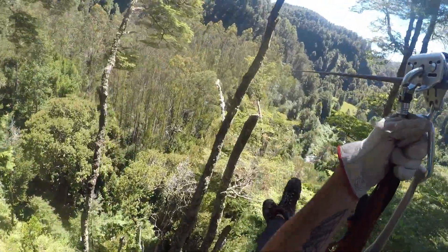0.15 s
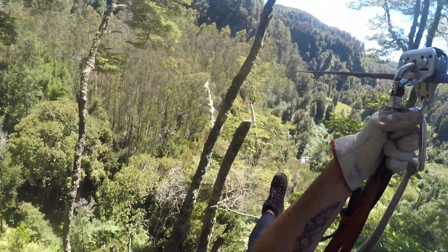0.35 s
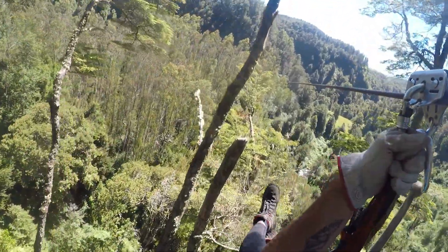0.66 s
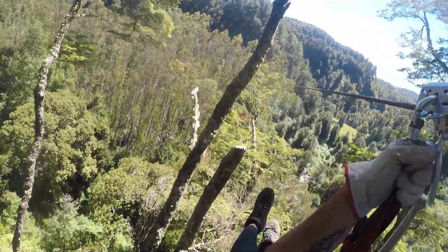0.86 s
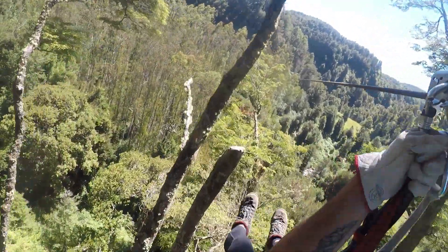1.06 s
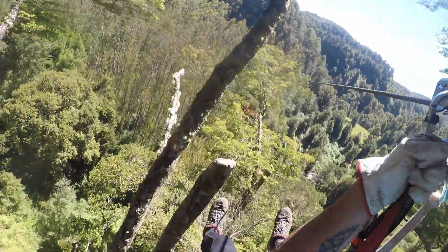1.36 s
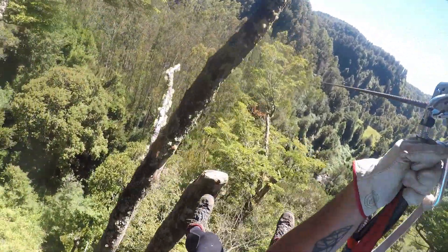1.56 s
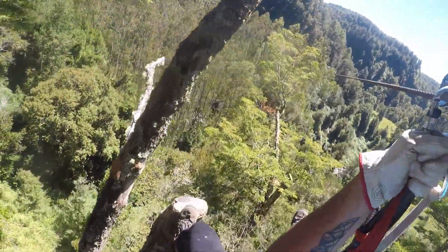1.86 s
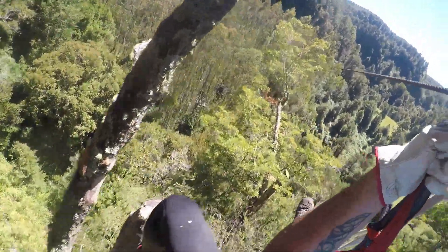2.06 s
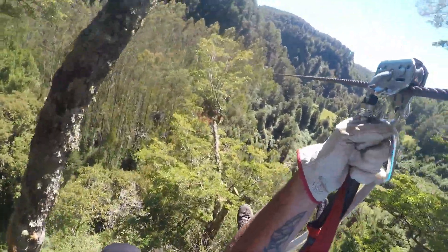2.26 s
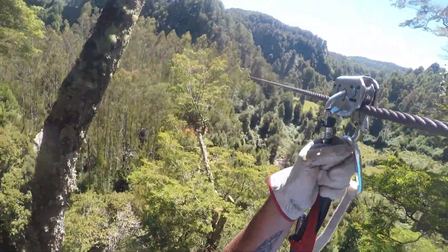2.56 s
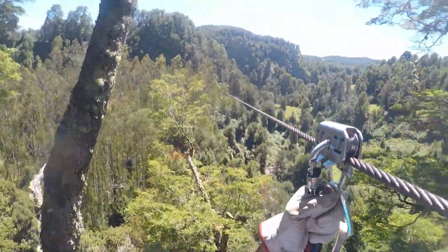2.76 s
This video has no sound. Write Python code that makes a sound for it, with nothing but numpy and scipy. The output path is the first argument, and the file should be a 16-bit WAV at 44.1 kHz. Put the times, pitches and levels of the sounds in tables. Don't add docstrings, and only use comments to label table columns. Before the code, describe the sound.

Zipline trolley whirring harshly on twisted cable slows to rattling ticks, halts, creeps on amid wind rumble

```python
import sys
import numpy as np
from scipy import signal
from scipy.fft import rfft, irfft, next_fast_len
from scipy.io import wavfile
from scipy.ndimage import uniform_filter1d, map_coordinates

SR = 44100
rng = np.random.default_rng(int(sys.argv[2]) if len(sys.argv) > 2 else 0)


def int16_out(signal):
    q = np.round(np.clip(np.atleast_2d(signal).T, -1, 1) * 32767)
    wavfile.write(sys.argv[1], SR, q.astype(np.int16))


def magnitude_from_level(level_db):
    exponent = np.asarray(level_db, float) / 20
    return 10 ** exponent


N = 127890

# time_s, crest_rate_per_s
CREST_RATE = [(0, 233), (.6, 230), (1, 212), (1.45, 183), (1.75, 160), (1.88, 146), (1.95, 92), (1.98, 79),
              (2.06, 82), (2.125, 86), (2.15, 70), (2.2, 55), (2.3, 50), (2.9, 60)]
# time_s, level_db
ROLL_LEVEL = [(0, -22.5), (.6, -22.5), (1, -21), (1.45, -21.5), (1.75, -21.5), (1.88, -21), (1.99, -29),
              (2.13, -26), (2.19, -35.5), (2.25, -54), (2.36, -57), (2.46, -51), (2.5, -41), (2.58, -42),
              (2.66, -34), (2.72, -40), (2.77, -43), (2.9, -41)]
# start_s, peak_db, dullness_db, t60_s
TICKS = [(1.9105, -14, -24, 0.024), (1.9732, -10.5, -33, 0.013), (2.0859, -11.5, -7, 0.018),
         (2.1198, -14.5, -11, 0.0072), (2.1324, -10.5, -22, 0.011), (2.16, -14.5, -7, 0.011),
         (2.2087, -22, 2, 0.027), (2.2463, -23.5, -23, 0.0075), (2.2906, -22.5, -25, 0.022),
         (2.3328, -35, -14, 0.011), (2.4794, -19.5, -23, 0.018), (2.508, -22, -22, 0.044),
         (2.5256, -21.5, 4, 0.047), (2.5592, -20, -5, 0.013), (2.594, -22, -2.5, 0.022),
         (2.6044, -22, 7, 0.012), (2.6274, -19, -9, 0.049), (2.6357, -20, 1, 0.024),
         (2.6707, -24, 5, 0.021), (2.7024, -17, -23, 0.0089), (2.7533, -15.5, 5.5, 0.013),
         (2.7614, -22, 3, 0.012), (2.774, -21, -3, 0.014), (2.7899, -16.5, -8, 0.012),
         (2.817, -24, 3, 0.015), (2.8506, -26, -5, 0.0097), (2.8644, -25.5, 8, 0.0068),
         (2.8869, -34.5, 19, 0.039),
         (1.873, -19, -20, .012), (1.888, -24, -20, .012), (1.928, -13, -20, .012),
                 (1.954, -14, -20, .012), (1.962, -14, -20, 0.018), (1.985, -18.5, -20, 0.014),
                 (1.996, -21, -20, .012), (2.0101, -18, -20, 0.008), (2.014, -21, -20, 0.012),
                 (2.0235, -18, -20, .012), (2.037, -18, -20, .012), (2.0479, -18, -11, 0.016),
                 (2.0614, -19, -16, 0.017), (2.075, -17, -18, .012), (2.097, -17, -18, 0.017),
                 (2.109, -25, -20, .012), (2.145, -21, -13, .014), (2.173, -17, -6, .014),
                 (2.1896, -21, -17, 0.011), (2.2137, -23, 0, 0.0099),
         (2.4658, -45, -10, .012), (2.488, -23, -15, .012), (2.5137, -28, -15, .012),
               (2.534, -26, -3, .012), (2.540, -22, 3, .012), (2.647, -25, -20, 0.017),
               (2.652, -29, -20, .015), (2.662, -29, -20, .015), (2.683, -28, -20, .015),
               (2.744, -26, 0, 0.017), (2.822, -30, -5, .008), (2.896, -35, 6, 0.014)]
# time_s, level_db
SIZZLE = [(0, -2), (.15, -3.5), (.28, -3), (.6, -3), (.8, -1), (1.3, 1.5), (1.75, 0), (1.95, 4.5),
          (2.1, 6.5), (2.2, -15), (2.45, -3), (2.6, -14), (2.9, 0)]
MODE_HZ = [680, 934, 1205, 1620, 1812, 2150, 3200, 3700, 4780, 6150, 7050, 7537, 8400, 11700]
# width_hz, left_db, right_db
MODE_AT_PORTS = [(250, -24.5, -35), (34.8, -21, -11.5), (86, -13, -5), (242, -20, -14.5),
                 (59.6, -16.5, -20.5), (295, -25.5, -30), (394, -41, -15.5), (464, -25, -11.5),
                 (90, -32, -11), (800, -19, -12), (1010, -11.5, -15.5), (45, -31, -20), (200, -36, -10.5),
                 (700, -41, -41)]
# frequency_hz, level_db
FRAME_TONE = [(300, -12), (800, 0.5), (7500, 1), (9000, -9), (10800, -22), (12000, -8), (13000, -20),
              (15000, -16)]
# frequency_hz, left_lead_rad
PORT_LEAD = [(0, -0.22), (1460, -3.5), (3270, -13.5), (3800, -13), (7900, -14.5), (10200, -14.5),
             (11000, -13), (15000, -11.5)]
# frequency_hz, level_db
SCATTERED = [(300, -33.5), (1000, -18), (2100, -14.5), (2900, -25), (5200, -18), (7000, -14), (9800, -22),
             (15000, -43.5)]
# frequency_hz, rms_db
MOUNT_HUM = [(40, -30), (55, -16), (82, -20), (110, -31), (150, -40), (185, -43), (230, -53)]
# time_s, pitch_hz, rms_db
PULLEY_TURN = [(0.0, 69.2, -39), (0.126, 73.5, -35), (0.206, 62.67, -33.5), (0.598, 64.13, -30.5),
               (0.692, 62.9, -25), (0.772, 55.2, -30), (0.92, 52.2, -30), (1.0, 54.6, -28),
               (1.354, 54.5, -24), (1.438, 53.23, -30.5), (1.676, 53.37, -28), (1.9, 58.32, -23)]
# time_s, strength_db
WIND_STRENGTH = [(0.0, -30.5), (.5, -29.5), (.72, -28.5), (1, -26), (1.3, -21.5), (1.55, -24),
                 (1.82, -20.5), (2.03, -15.5), (2.25, -18), (2.33, -21), (2.44, -24), (2.54, -20),
                 (2.68, -25), (2.9, -23)]
# frequency_hz, density_db_per_hz
RUMBLE_TONE = [(8, -43), (15, 1), (30, -7), (65, -8), (110, -17), (150, -34.5), (300, -34), (500, -67)]
# centre_s, peak_db, length_s, left_minus_right_db
PUFFS = [(0.134, -30.5, 0.031, -4.5), (0.227, -40, 0.014, 6), (0.622, -42, 0.011, 10),
         (0.707, -33, 0.014, -20), (0.929, -33, 0.012, -2), (1.055, -28, 0.03, -3.5),
         (1.238, -26.5, 0.031, -2), (1.289, -31.5, 0.023, -14), (1.502, -36, 0.017, -13),
         (1.697, -31, 0.025, 3), (1.843, -38.5, 0.037, 8), (1.99, -33, 0.021, 9), (2.136, -20, 0.0047, 8),
         (2.447, -29, 0.0053, 1), (2.537, -18.5, 0.01, 0)]
# frequency_hz, level_db
PUFF_TONE = [(40, -1.5), (110, -2.5), (200, -2), (400, -15.5), (900, -43.5)]
# start_s, level_db, pitch_hz
KNOCKS = [
    (2.041, -15.5, 800),
    (2.122, -17, 760),
    (2.533, -17.5, 700),
]
# pitch_ratio, level_db
KNOCK_MODES = [(.6, 1), (1.0, 4), (1.3, 3), (2.8, -8)]
# frequency_hz, density_db_per_hz
FOREST_TONE = [(76, -24), (130, -4), (277, -13), (690, -14), (1620, -18), (2720, -26.5), (9000, -36),
               (15000, -70)]

CREST_AT_S, LAST_CREST_S = 2.0852, 1.945
CREST_T60_S, CREST_JITTER, CREST_SCATTER_DB = 0.01, 0.071, 2.5
PAIRING_DB = 2.2
RUB_DB, RUB_DB_PER_OCTAVE = 0, 1.5
TICK_DB, SNAP_DB = -3.5, 9.5
TAIL_DB, TAIL_T60_S, RATTLE_DB = -19.5, 0.14, 5
DULL_HZ, SIZZLE_HZ = 7800, 9300
BEARING_HZ, BEARING_DB = 2090, -1.5
RING_HZ, RING_WANDER_HZ, RING_DB = 1208, 54.24, -20.5
STOP_S, HUM_FADE_S, HUM_WANDER_RAD = 2.27, .03, 1.1
TURN_OVERTONE_DB, TURN_FADE_S = -14.5, 0.068
SWAY_HZ, SWAY_WIDTH_HZ, SWAY_DB = 54.4, 20.7, -4
KNOCK_T60_S, KNOCK_LEAD_RAD = .016, 2.2
FOREST_DB = -48
TOP_HZ, CEILING = 15180, 1


def unit(x):
    return x / np.sqrt(np.mean(x ** 2) + 1e-20)


def along(points, hz):
    f, v = np.transpose(points)
    return np.interp(np.log(hz + 1), np.log(f + 1), v)


def curves(rows):
    s, *cols = np.transpose(rows)
    return [np.interp(np.arange(N) / SR, s, c) for c in cols]


def wobble(rate):
    knots = rng.standard_normal(int(3 * rate) + 4)
    return map_coordinates(knots, [np.arange(N) * rate / SR])


def filtered(x, response):
    m = 2 * next_fast_len(N // 2 + 4096)
    return irfft(rfft(x, m) * response(np.fft.rfftfreq(m, 1 / SR)), m)[..., :N]


def causal(gain):
    c = irfft(np.log(gain + 1e-6))
    c[1:len(c) // 2] *= 2
    c[len(c) // 2 + 1:] = 0
    return np.exp(rfft(c))


def wide_noise(alike):
    def mid_side_gain(hz):
        angle = np.arccos(np.clip(along(alike, hz), -1, 1)) / 2
        return np.array([np.cos(angle), np.sin(angle)])
    mid, side = filtered(rng.standard_normal((2, N)), mid_side_gain)
    return np.array([mid + side, mid - side])


def trolley():
    (rate,), (level_db,) = curves(CREST_RATE), curves(ROLL_LEVEL)
    passed = np.cumsum(rate) / SR
    passed -= passed[round(CREST_AT_S * SR)]
    level = magnitude_from_level(level_db + 0.55 * wobble(11.8))
    fast = np.clip((rate - 60) / 170, 0, 1)
    bursts, snaps = ticks()
    contact = crest_scrape(rate, passed, level) + bursts
    dulled = filtered(contact, lambda hz: 1 / (1 + 1j * hz / DULL_HZ) ** 2 * 1.116)
    drive = fast * contact + (1 - fast) * dulled + snaps
    sizzle = filtered(drive, lambda hz: 1 / (1 + (SIZZLE_HZ / (hz + 1)) ** 12))
    drive = drive + (magnitude_from_level(curves(SIZZLE)[0]) - 1) * sizzle
    low = lambda hz: 1 / (1 + (hz / BEARING_HZ) ** 6)
    drive = drive - .5 * filtered(drive, low) + filtered(bearings(rate, level), low)
    drive[0] += level * np.sqrt(fast) * flange_ring()
    scattered = filtered(drive[1:], lambda hz: causal(magnitude_from_level(along(SCATTERED, hz) + 14)))
    return filtered(drive[0], frame) + scattered + mount_hum(rate, passed)


def crest_scrape(rate, passed, level):
    at = np.flatnonzero(np.diff(np.floor(passed[:round(LAST_CREST_S * SR)])))
    jitter, scatter = np.clip(rng.standard_normal((2, len(at))), -1.7, 1.7)
    pairing_db = PAIRING_DB * (-1.) ** np.arange(len(at)) * (0.5 + wobble(8.3)[at])
    kick_at = np.clip(at + CREST_JITTER * jitter * SR / rate[at], 0, N - 1).astype(int)
    kicks = np.zeros(N)
    kicks[kick_at] = magnitude_from_level(CREST_SCATTER_DB * scatter + pairing_db)
    t = np.arange(SR // 20) / SR
    kick_shape = magnitude_from_level(-60 * t / CREST_T60_S) * (1 - np.exp(-t / 0.00024))
    crests = np.abs(signal.fftconvolve(kicks, kick_shape)[:N])
    crests /= np.sqrt(uniform_filter1d(crests ** 2, SR // 10) + 0.008)
    rub = magnitude_from_level(RUB_DB + RUB_DB_PER_OCTAVE * np.log2(rate / 230) + 0.96 * wobble(70))
    return np.hypot(crests, rub) * level * rng.standard_normal((3, N))


def ticks():
    bursts, snaps = np.zeros((2, 3, N))
    t = np.arange(SR // 20) / SR
    snap_t = t[:40]
    rattle_db = RATTLE_DB * np.clip(wobble(220), -2, 2)
    for s, db, dull_db, t60 in TICKS:
        start = round(s * SR)
        uneven_db = np.resize(rattle_db[start:], len(t))
        tail = magnitude_from_level(TAIL_DB - 60 * t / TAIL_T60_S + uneven_db)
        burst = rng.standard_normal((3, len(t))) * (magnitude_from_level(-60 * t / max(t60, .003)) + tail)
        burst = burst + magnitude_from_level(dull_db) * uniform_filter1d(burst, size=9, origin=4)
        snap = magnitude_from_level(db + TICK_DB + SNAP_DB - 60 * snap_t / 0.00061)
        snaps[:, start:][:, :40] += snap * rng.standard_normal((3, 40))
        spot = bursts[:, start:][:, :len(t)]
        spot += magnitude_from_level(db + TICK_DB) * burst[:, :spot.shape[1]]
    return bursts, snaps


def bearings(rate, level):
    gain_db = np.log2(rate / 230) + BEARING_DB + 1.82 * wobble(23.03)
    return level * magnitude_from_level(gain_db) * rng.standard_normal((3, N))


def flange_ring():
    phase = 2 * np.pi * np.cumsum(RING_HZ + RING_WANDER_HZ * wobble(30)) / SR
    return magnitude_from_level(RING_DB + 3.1 * wobble(24.98)) * np.sin(phase)


def frame(hz):
    power = 0
    for centre, (width, left_db, right_db) in zip(MODE_HZ, MODE_AT_PORTS):
        power = power + magnitude_from_level([[left_db], [right_db]]) ** 2 / (1 + (2 * (hz - centre) / width) ** 2)
    gain = np.sqrt(power) * magnitude_from_level(along(FRAME_TONE, hz))
    mean = np.sqrt(gain[0] * gain[1])
    lead = np.interp(hz, *np.transpose(PORT_LEAD)) / 2
    response = causal(mean) * gain / mean * np.exp(1j * np.array([lead, -lead]))
    return response / np.sqrt(np.mean(mean ** 2))


def mount_hum(rate, passed):
    level = magnitude_from_level(along(MOUNT_HUM, rate) + 2.8 * wobble(18) + 1.5)
    hum = level * np.sin(2 * np.pi * passed + HUM_WANDER_RAD * wobble(15))
    after_stop = (np.arange(N) / SR - STOP_S) / HUM_FADE_S
    return hum / (1 + np.exp(np.clip(after_stop, -20, 20)))


def pulleys():
    hz, level_db = curves(PULLEY_TURN)
    phase = 2 * np.pi * np.cumsum(hz) / SR
    fade = np.clip((PULLEY_TURN[-1][0] - np.arange(N) / SR) / TURN_FADE_S + 1, 0, 1)
    overtone = magnitude_from_level(TURN_OVERTONE_DB + 4.9 * wobble(9.02)) * np.sin(2 * phase + 1.42 * wobble(9.9))
    throb = np.sin(phase + 0.89 * wobble(16)) + overtone
    level = np.sqrt(2) * fade * magnitude_from_level(level_db - 2.0 + 3.5 * wobble(11))
    return level * throb * magnitude_from_level([[.4], [-.4]])


def wind():
    strength_db, = curves(WIND_STRENGTH)
    noise = wide_noise([(30, 0.97), (80, 0.84), (150, 0.65), (300, 0.069)])
    rumble = unit(filtered(noise, lambda hz: magnitude_from_level(along(RUMBLE_TONE, hz))))
    sway = unit(filtered(wide_noise([(30, 1.0)]),
                         lambda hz: 1 / (1 + (2 * (hz - SWAY_HZ) / SWAY_WIDTH_HZ) ** 2)))
    t = np.arange(N) / SR
    swell = np.zeros((2, N))
    for s, db, length, pan in PUFFS:
        swell += magnitude_from_level(db + np.array([[pan / 2], [-pan / 2]])) * np.exp(-((t - s) / length) ** 2)
    noise = wide_noise([(100, 0.17), (400, 0.033)])
    puff = unit(filtered(noise, lambda hz: magnitude_from_level(along(PUFF_TONE, hz))))
    gusts = magnitude_from_level(strength_db - 2.5 + 0.14 * wobble(7.5) + [[.5], [-.5]])
    return (rumble + magnitude_from_level(SWAY_DB) * sway) * gusts + magnitude_from_level(-2.0) * swell * puff


def harness():
    out, t = np.zeros((2, N)), np.arange(SR // 10) / SR
    for s, db, hz in KNOCKS:
        for ratio, mode_db in KNOCK_MODES:
            ring = np.sin(2 * np.pi * hz * ratio * t + np.array([[KNOCK_LEAD_RAD], [0]]))
            decay = magnitude_from_level(db + mode_db - 60 * t / KNOCK_T60_S) * (1 - np.exp(-t / 0.001))
            out[:, round(s * SR):][:, :len(t)] += decay * ring
    return out


def forest():
    noise = wide_noise([(200, 0.42), (2000, 0.037)])
    return magnitude_from_level(FOREST_DB + 3.0) * unit(filtered(noise, lambda hz: magnitude_from_level(along(FOREST_TONE, hz))))


def scene():
    return trolley() + pulleys() + wind() + harness() + forest()


def low_pass(x):
    return signal.sosfilt(signal.butter(12, 15250, fs=SR, output="sos"), x)


def record(dry):
    x = filtered(dry, lambda hz: hz < TOP_HZ)
    mix = x / (1 + np.abs(x / CEILING) ** 4) ** .25
    return low_pass(mix)


dry = scene()
out = record(dry)
int16_out(out)
```